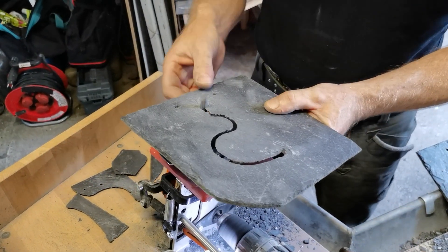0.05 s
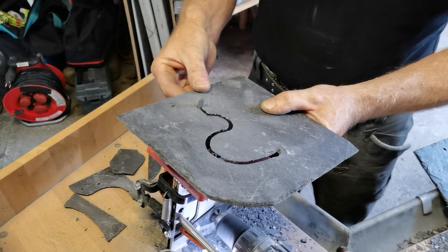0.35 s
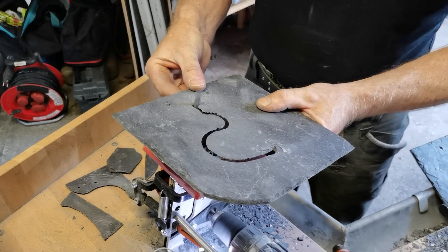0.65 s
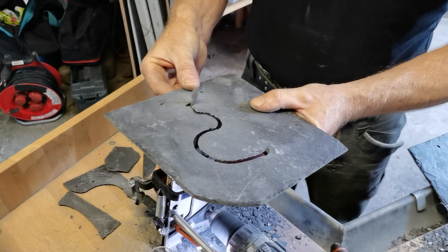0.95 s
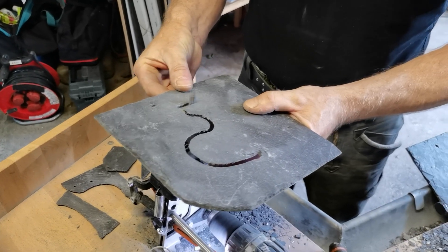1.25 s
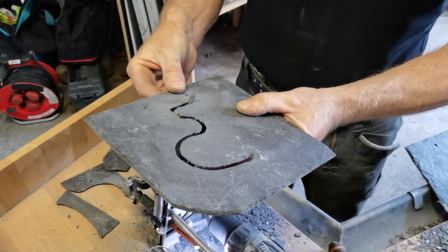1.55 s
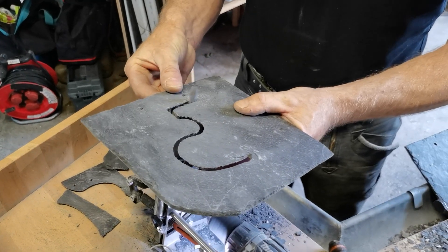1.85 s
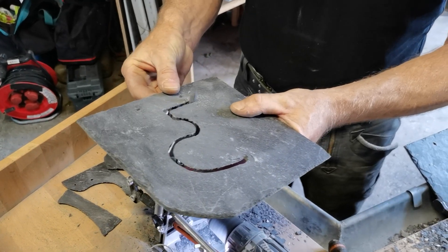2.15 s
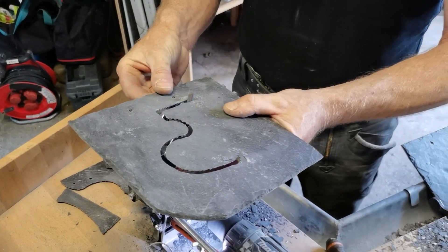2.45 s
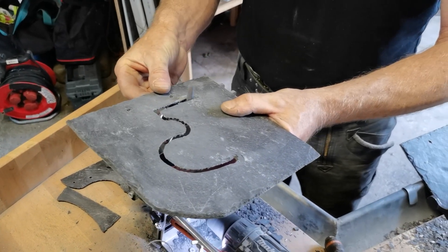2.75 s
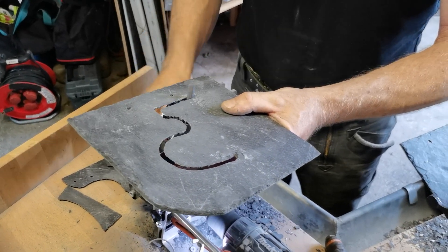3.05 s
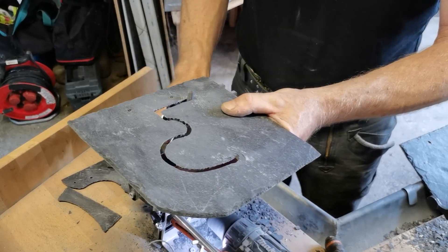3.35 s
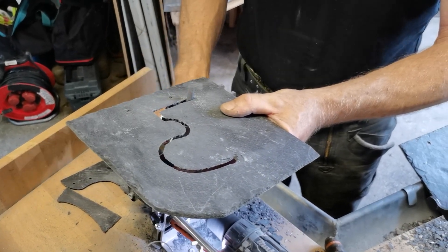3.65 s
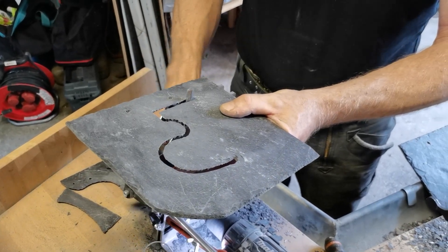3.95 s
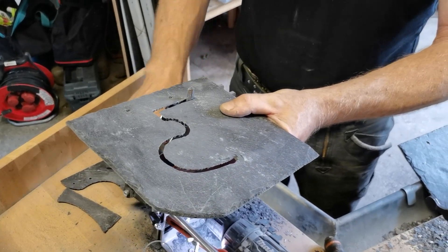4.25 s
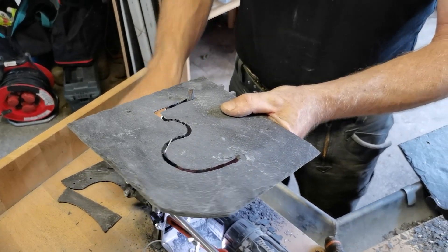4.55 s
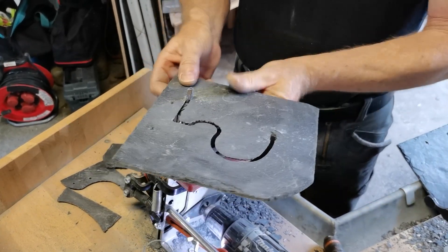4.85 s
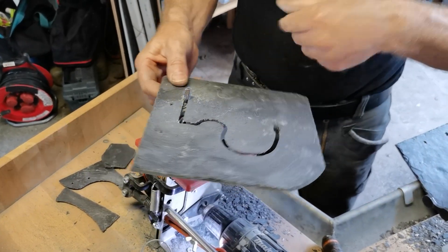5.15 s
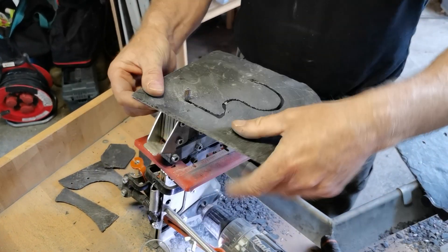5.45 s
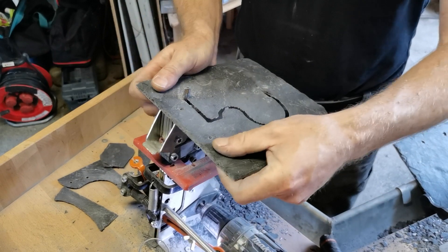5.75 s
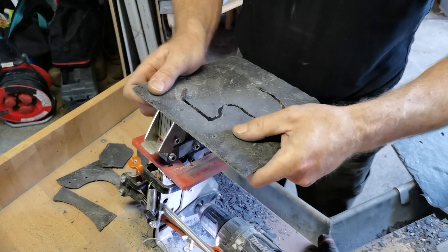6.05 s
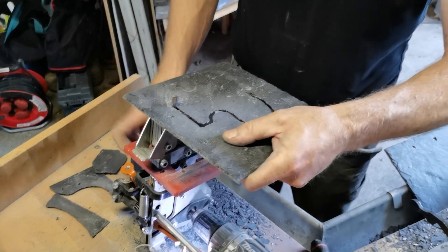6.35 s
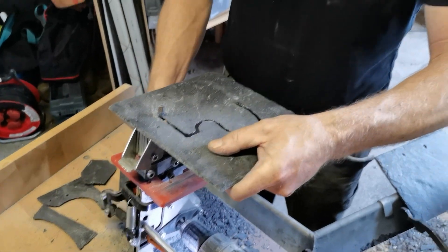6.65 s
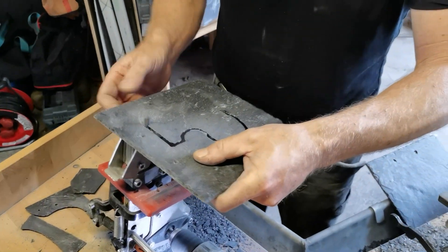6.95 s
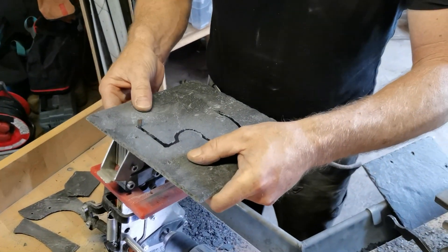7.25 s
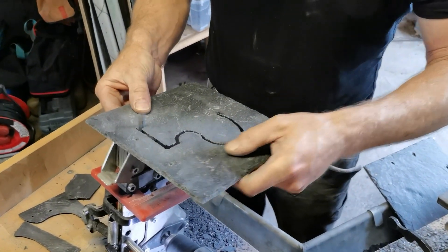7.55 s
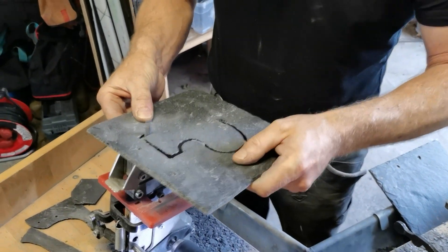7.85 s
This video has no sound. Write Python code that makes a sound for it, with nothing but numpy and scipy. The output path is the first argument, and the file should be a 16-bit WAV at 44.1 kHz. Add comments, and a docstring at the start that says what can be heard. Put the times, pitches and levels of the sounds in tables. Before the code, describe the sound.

A motorized slate cutter nibbles through a stone plate with rapid, uneven chattering over rattling gears, a hum and a thin high whine. After about four seconds the motor stops. The plate is shifted around with quieter knocks, clinks and scrapes and a brief rubbing tone. Then the machine restarts with a jolt and chatters on. It is heard close up in a small workshop.

```python
"""A motor-driven slate nibbler chews a curved slot through a hand-held stone plate in a small workshop.
Its crank punches about 29 times a second over rattling gears, a hum and a high whine. With each push
of the hands the punch bites deeper, knocks the plate, rings and snaps off crumbs. The motor stops and
the frame rings on; the plate is freed, slid round with a brief moan and set down, and cutting resumes."""
import sys
import numpy as np
from scipy import signal
from scipy.fft import rfft, irfft, next_fast_len
from scipy.io import wavfile
from scipy.ndimage import uniform_filter1d

SR = 44100
rng = np.random.default_rng(int(sys.argv[2]) if len(sys.argv) > 2 else 0)


def generate_wav(signal):
    """Clip the signal to [-1, 1] and save it as 16-bit WAV at the path in sys.argv[1]."""
    frames = np.transpose(np.atleast_2d(signal))
    scaled = np.clip(frames, -1, 1) * 32767
    pcm = np.round(scaled).astype(np.int16)
    wavfile.write(sys.argv[1], SR, pcm)


N = 347949
TAPS = 2048
HZ, TIME = np.fft.rfftfreq(TAPS, 1 / SR), np.arange(N) / SR
STOP_S = 4.079  # end of the first cut

# Progress of the crank, one list per cut. Each row: time in seconds, strokes made.
CRANK_TURNS = [
    [(-.0162, -1), (.53, 15), (1.2442, 36), (1.4157, 41), (2.003, 58), (3.4805, 101), (4.0325, 117),
     (4.0781, 118)],
    [(6.7671, 0), (6.9178, 4), (7.0235, 7), (7.1958, 12), (7.6394, 25), (7.88, 32)],
]
# The plate on its rest, one list per cut. Each row: pitch in Hz, width in Hz, level in dB.
PLATE_MODES = [
    [(227, 17, -9), (407, 18, -1.5), (600, 98, -6.5), (756, 53, -7), (1058, 49, -5.5), (1556, 110, -7),
     (1882, 68, -3), (2060, 78, -2), (2622, 37, -6)],
    [(229, 89, 1), (696, 210, -8.5), (1023, 88, -2), (1245, 65, -3.5), (1510, 120, -4.5), (2130, 110, -3.5),
     (2670, 140, -13)],
]
# The steel punch. Each row: pitch in Hz, width in Hz, level in dB.
PUNCH_MODES = [(7160, 200, 1), (7870, 540, 1), (9000, 120, 4.5), (9470, 2100, -0.5), (10850, 470, -10),
               (12700, 1400, -9), (14500, 2500, -23)]
# The plate when it is off the punch. Each row: pitch in Hz, width in Hz, level in dB.
LOOSE_MODES = [(626, 35, -1), (890, 130, -6), (2140, 91, -4.5), (3545, 51, 0), (3630, 50, -21),
               (3930, 94, -1), (4430, 81, -3), (4950, 54, -3), (7100, 110, -10)]
# Tone of the plate bumping and scraping on its rest. Each row: frequency in Hz, level in dB.
BUMP_SPECTRUM = [(35, -39), (60, -2), (215, -2), (280, -10), (419, -1.5), (463, -13.5), (595, -14.5),
                 (774, -50), (1200, -33), (1560, -72), (2640, -120)]
SCRAPE_SPECTRUM = [(350, -26), (600, 0), (807, -6), (875, -7.5), (1280, -8.5), (2130, -11.5), (3060, -11),
                   (3360, -10.5), (4900, -20), (5110, -19), (6000, -17.5), (7060, -24.5), (10400, -17.5),
                   (15000, -44)]


def amp(db):
    """Decibels to gain."""
    return 10 ** (np.asarray(db) / 20)


def unit(x):
    """Scales to rms 1."""
    return x / np.sqrt(np.mean(x ** 2) + 1e-20)


def read(points, hz):
    """Reads a table along a log-frequency axis."""
    f, value = np.transpose(points)
    return np.interp(np.log(hz + 1), np.log(f + 1), value)


def curves(rows, t=TIME):
    """The columns of a time table, joined by straight lines."""
    s, *columns = np.transpose(rows)
    return [np.interp(t, s, c) for c in columns]


def add(mix, s, sound):
    """Mixes a sound in at s seconds."""
    part = mix[max(round(s * SR), 0):][:len(sound)]
    part += sound[:len(part)]


def gate(start, end, rise, fall):
    """Fades in from start and out from end, all in seconds."""
    return np.clip((TIME - start) / rise, 0, 1) * np.clip(1 - (TIME - end) / fall, 0, 1)


def causal(gain):
    """The minimum-phase impulse response of a passive body with this gain curve."""
    log_gain = np.log(np.maximum(gain / gain.max(), 1e-5))
    mirrored = np.r_[log_gain, log_gain[-2:0:-1]]
    return np.fft.ifft(np.exp(np.conj(signal.hilbert(mirrored)))).real


def body(modes):
    """Impulse response of a set of resonances, rolled off outside their range."""
    hz, width, db = np.transpose(modes)[:, :, None]
    power = (amp(db) ** 2 / (1 + (2 * (HZ - hz) / width) ** 2)).sum(0)
    skirts = 1 + (0.39 * hz.min() / (HZ + 1)) ** 4 + (HZ / (1.9 * hz.max())) ** 4
    return causal(np.sqrt(power / skirts))


def struck(modes, colour_db, detune):
    """Each hit lands on another spot, which favours other modes and shifts them a little."""
    return body([(hz * (1 + detune * rng.standard_normal()), width,
                  db + colour_db * rng.standard_normal()) for hz, width, db in modes])


def colour(x, spectrum):
    """Gives a long sound a spectrum, at rms 1."""
    return unit(signal.oaconvolve(x, causal(amp(read(spectrum, HZ))))[:len(x)])


def grit(per_s, spread_db):
    """Tiny fractures of very unequal size."""
    size = amp(spread_db * np.minimum(rng.exponential(1, N), 4))
    return unit(rng.standard_normal(N) * size * (rng.random(N) < per_s / SR))


def wander(per_s):
    """A random drift that glides to a new value per_s times a second."""
    knots = rng.standard_normal(4000)
    return np.interp(TIME * per_s, np.arange(len(knots)), knots)


def blow(response, contact, crack, hold_s, decay_s, alike=0):
    """A crack and a burst of crushing ring a body; alike is the share taken from the contact noise."""
    t = np.arange(len(contact)) / SR
    crush = np.sqrt(alike) * contact + np.sqrt(1 - alike) * rng.standard_normal(len(contact))
    crush *= np.exp(-np.maximum(t - hold_s, 0) / decay_s)
    crush /= np.linalg.norm(crush)
    crush[0] += crack
    sound = signal.fftconvolve(crush, response)
    return sound / np.linalg.norm(sound) * np.sqrt(SR / 100)  # the energy of 10 ms at rms 1


def feed(t, press_db_per_s=298.5, relax_db_per_s=195.5):
    """Ring, knock and snap in dB at times t: the firmest push counts, or else the punch just grazes."""
    # The hands push the plate in. Each row: start and end in seconds, ring in dB,
    # then knock and snap in dB relative to the ring.
    pushes = [(0.034, 0.113, -16, -9.5, -6), (0.152, .36, -16, -1, -9), (0.402, .496, -17, -2, -2.5),
              (0.77, .87, -25, 1, -8), (0.949, .972, -19.5, -5, -1), (1.077, 1.118, -15, 3, -5.5),
              (1.236, 1.414, -18.5, 4.5, -4.5), (1.48, 1.683, -19.5, 5.5, -3.5), (1.745, 2.036, -20, 4, -4),
              (2.072, 2.149, -18.5, 6, -2), (2.174, 2.281, -24.5, 2.5, -3), (2.313, 2.38, -17, 2.5, -4),
              (2.555, 2.617, -16.5, -3, -7), (2.766, 2.791, -15, -0.5, -6), (2.89, 3.272, -20, -2.5, -5.5),
              (3.093, 3.127, -12.5, -7, -13), (3.429, 3.489, -16.5, -0.5, -2),
              (3.556, 3.772, -18, -6, -2.5), (3.805, 4.032, -22.5, -4.5, 3), (4.072, 4.08, -21.5, -2.5, -5),
              (6.88, 6.912, -16.5, 1, -5), (7.026, 7.216, -18.5, -1, -6.5), (7.259, 7.506, -24, -4, -6.5),
              (7.537, 7.645, -18.5, -5.5, -10.5), (7.674, 7.736, -19.5, 0, -4.5),
              (7.852, 7.89, -14.5, -4, -3.5)]
    # The graze between pushes: ring in dB, then knock and snap in dB relative to it.
    graze = (-30, -6.5, -3)
    start, end, ring, knock, snap = np.transpose(pushes)[:, :, None]
    ring = ring - press_db_per_s * np.maximum(start - t, 0) - relax_db_per_s * np.maximum(t - end, 0)
    pushed = np.array([ring, ring + knock, ring + snap]).max(1)
    grazed = graze[0] + np.array([0, graze[1], graze[2]])[:, None]
    off_stone = (t > STOP_S) & (t < CRANK_TURNS[1][1][0])
    return np.where(off_stone, pushed, np.maximum(pushed, grazed))


def strokes(crank, alternate_db=0.4, chance_db=1.55):
    """One stroke a turn: a deep bite leaves less for the next, and the stone breaks unevenly."""
    s, made = np.transpose(crank)
    turn = np.arange(made[-1] + 1)
    times = np.interp(turn, made, s)
    depth_db = -alternate_db * (-1) ** turn + chance_db * rng.standard_normal(len(turn))
    return np.column_stack([times, (feed(times) + depth_db).T])


def cutter(bend_hz=1346, bend_width_hz=54, ring_width_hz=95, ring_mode_db=3.5):
    """Each stroke knocks the plate, rings the modes near the cutter and snaps stone on the steel punch."""
    # Modes near the cutter, one list per cut. Each row: pitch in Hz, width in Hz, level in dB.
    cutter_modes = [
        [(3480, 67, -11.5), (3706, 74, -8.5), (4230, 77, -4), (4096, 170, -1), (4920, 130, -11.5),
         (5370, 1200, -16)],
        [(3230, 96, -5.5), (4116, 140, 2), (4160, 150, -8), (4725, 200, 2.5), (5300, 240, -9)],
    ]
    # The place of the cut sets the main ring and how far the plate bends.
    # Each row: time in seconds, ring pitch in Hz, level of the bending mode in dB.
    cut_place = [(.3, 3970, 9), (1.35, 3770, 7.5), (1.6, 4210, -5.5), (2.1, 4190, -4.5), (2.25, 4200, 10.5),
                 (2.33, 4100, -12), (3.1, 4144, 6), (4, 4152, 4.5), (6.9, 3650, -6), (7.8, 3730, 5)]
    out, contacts = np.zeros(N), rng.standard_normal((3, TAPS))
    for crank, plate_modes, near_modes in zip(CRANK_TURNS, PLATE_MODES, cutter_modes):
        for s, ring_db, knock_db, snap_db in strokes(crank):
            # the contact changes gradually as the slot advances
            contacts = unit(contacts + 0.32 * rng.standard_normal(contacts.shape))
            ring_hz, bend_db = curves(cut_place, s)
            plate = struck([*plate_modes, (bend_hz, bend_width_hz, bend_db)], colour_db=1.85, detune=.008)
            near = struck([*near_modes, (ring_hz, ring_width_hz, ring_mode_db)],
                          colour_db=3.5, detune=.011)
            punch = struck(PUNCH_MODES, colour_db=2.5, detune=.002)
            knock = blow(plate, contacts[0], crack=.33, hold_s=.0037, decay_s=.0049, alike=.79)
            ring = blow(near, contacts[1], crack=.15, hold_s=.0035, decay_s=.0044, alike=.6)
            snap = blow(punch, contacts[2], crack=.27, hold_s=.0035, decay_s=.0033, alike=.55)
            add(out, s, amp(knock_db) * knock + amp(ring_db) * ring + amp(snap_db) * snap)
    return out


def clunks():
    """A hollow knock opens the scene; at the restart the drive takes up its slack and jolts the plate."""
    # The hollow knock: start in seconds, pitch in Hz, width in Hz, level in dB.
    hollow_knock = (0, 830, 260, -49.5)
    # Jolts of the drive. Each row: start in seconds, level in dB.
    jolts = [(6.7675, -39), (6.805, -28)]
    out, contact = np.zeros(N), rng.standard_normal(TAPS)
    s, hz, width, db = hollow_knock
    add(out, s, amp(db) * blow(body([(hz, width, 0)]), contact, crack=.31, hold_s=.004, decay_s=.018))
    for s, db in jolts:
        add(out, s, amp(db) * blow(body(PLATE_MODES[1]), contact, crack=.25, hold_s=.0044, decay_s=.007))
    return out


def motor_speed(gearing, sag_hz=430, inertia_s=.05):
    """Whine pitch in Hz: the crank's pace geared up, sagging under load, smoothed by the rotor's mass."""
    pace = sum(np.gradient(curves(crank)[0]) * SR for crank in CRANK_TURNS)
    load = amp(feed(TIME[::100])).sum(0).repeat(100)[:N]
    load /= load.max()
    surge = load - uniform_filter1d(load, size=SR // 2)
    inertia = np.exp(-1 / (inertia_s * SR))
    sag = signal.lfilter([1 - inertia], [1, -inertia], surge)
    return gearing * uniform_filter1d(pace, size=2600) - sag_hz * sag


def gears(crank_phase, powered, throb=0.24):
    """Gears rattle and dust grinds, the hiss throbbing five times a stroke."""
    # Running noise, one list per cut. Each row: time in seconds, rumble in dB, hiss in dB.
    running_levels = [
        [(0, -26.5, -28.5), (.7, -30, -30), (1.4, -25.5, -28.5), (2.3, -28.5, -30.5), (3.3, -30, -31),
         (4.05, -31.5, -32.5)],
        [(6.78, -37, -43.5), (6.835, -36, -50), (6.865, -25.5, -30), (6.93, -26, -27), (7.3, -26, -26),
         (7.89, -25.5, -26)],
    ]
    # Tone of the gears and of the grinding, one list per cut. Each row: frequency in Hz, level in dB.
    gear_spectra = [
        [(32, -34.5), (55, -14.5), (98, -2.5), (160, -7), (223, 3), (304, -9), (409, 0), (523, -4.5),
         (871, -5.5), (1170, -10), (1360, -5), (2620, -14), (2800, -14), (3640, -45.5), (6160, -120)],
        [(32, -43), (55, -19), (75, -8.5), (152, -2.5), (299, -5.5), (409, -1.5), (523, -5.5), (597, -4),
         (1470, -9), (2800, -15.5), (3640, -45), (6160, -120)],
    ]
    grind_spectra = [
        [(1650, -43), (2800, -11), (3750, 1), (4310, 0), (4630, -4), (6380, -10), (7280, -5.5), (8480, -9.5),
         (9530, -1.5), (10600, -8), (11500, -6.5), (13600, -10.5), (16000, -21.5)],
        [(1650, -31), (2800, -15), (3220, -10), (3750, 1.5), (4370, -10), (4870, -9.5), (5680, -14.5),
         (7280, -11), (8550, -13), (11500, -13), (15200, -20.5), (16000, -15.5)],
    ]
    out = np.zeros(N)
    for on, levels, gear_tone, grind_tone in zip(powered, running_levels, gear_spectra, grind_spectra):
        rumble_db, hiss_db = curves(levels)
        rumble = amp(rumble_db) * colour(grit(per_s=6000, spread_db=3), gear_tone)
        hiss = amp(hiss_db) * colour(grit(per_s=20000, spread_db=1.5), grind_tone)
        out += on * (rumble + hiss * (1 + throb * np.sin(5 * crank_phase)))
    return out


def crank_hum(crank_phase):
    """Crank and gears hum on wavering harmonics of the stroke rate."""
    # Partials of the hum. Each row: multiple of the stroke rate, relative level in dB.
    harmonics = [(3, -39.5), (4, -34.5), (8, -40.5), (14, -39), (15, -50), (19, -40), (23, -43.5)]
    out = np.zeros(N)
    for multiple, db in harmonics:
        level = amp(db + 3.2 * wander(11))
        out += level * np.sin(multiple * crank_phase + 0.55 * wander(16) + 2 * np.pi * rng.random())
    return out


def motor_whine(hz, onset_hz=(10200, 10700)):
    """A thin, fluttering whine that fades in across onset_hz as the motor gathers speed."""
    flutter = amp(1.3 * wander(90))
    phase = 2 * np.pi * np.cumsum(hz + 22 * wander(250)) / SR
    return np.interp(hz, onset_hz, [0, 1]) * flutter * np.sin(phase)


def motor(gearing=380.3, whine_db=-36, hum_db=-1, restart_hum_db=-4):
    """The motor runs once per cut, gearing whine cycles to a stroke. Returns drive noise and hum."""
    whine_hz = motor_speed(gearing)
    crank_phase = 2 * np.pi * np.cumsum(whine_hz) / gearing / SR
    first, second = gate(-1, 4.093, .01, .041), gate(6.77, 8, .0078, .01)
    rattle = gears(crank_phase, powered=(first, second))
    hum = crank_hum(crank_phase) * (amp(hum_db) * first + amp(restart_hum_db) * second)
    whine = amp(whine_db) * (first + second) * motor_whine(whine_hz)
    up_to_speed = (whine_hz / whine_hz.max()) ** 4
    return rattle + whine, up_to_speed * hum


def frame():
    """The machine frame rings on after the first cut until the plate is lifted."""
    # Modes of the frame. Each row: pitch in Hz, level in dB, seconds to fall by 60 dB.
    frame_modes = [(121, -56, 3.6), (218, -60.5, 5.1), (670, -57, 2.4)]
    age = np.maximum(TIME - STOP_S, 0)
    ringing = sum(amp(db - 60 * age / t60) * np.sin(2 * np.pi * hz * age) for hz, db, t60 in frame_modes)
    return ringing * gate(STOP_S, 4.6, .013, .12)


def clinks(detune=0.025, count=6):
    """Small catches ring the plate; its modes shift as the points of support move."""
    out = np.zeros(N)
    for _ in range(count):
        modes = [(hz * (1 + detune * rng.uniform(-1.4, 1)), width, db) for hz, width, db in LOOSE_MODES]
        catches = grit(per_s=55, spread_db=3) * amp(4 * wander(10))
        out += signal.oaconvolve(catches, body(modes))[:N]
    return unit(out)


def sliding(bump_db=-5, scrape_db=-3, clink_db=0.5, contact_db=-73):
    """The plate bumps and scrapes over its rest in swelling shoves, above the light contact of hands."""
    # Shoves. Each row: middle and half length in seconds, relative bumping and scraping in dB.
    shoves = [(4.732, 0.033, -50, -53.5), (5.026, 0.15, -56, -62), (5.413, 0.15, -52, -49),
              (5.563, 0.049, -40.5, -57.5), (5.671, 0.037, -49, -70), (5.81, 0.083, -51.5, -53),
              (6.034, 0.045, -53, -63), (6.267, 0.055, -51.5, -66), (6.67, 0.046, -55, -86.5)]
    middle, half, bumps_db, scrapes_db = np.transpose(shoves)[:, :, None]
    swell = np.exp(-((TIME - middle) / half) ** 2)
    bump_gain = amp(bump_db) * (amp(contact_db) + (amp(bumps_db) * swell).sum(0))
    scrape_gain = amp(scrape_db) * (amp(scrapes_db) * swell).sum(0)
    rasp = colour(grit(per_s=2200, spread_db=2), SCRAPE_SPECTRUM)
    scrape = unit(rasp + amp(clink_db) * clinks())
    bump = colour(grit(per_s=810, spread_db=3), BUMP_SPECTRUM)
    return (bump_gain * bump + scrape_gain * scrape) * gate(4.0, 8.6, .06, .037)


def plate_knocks(ringing_db=0.5, tick_db=-11):
    """Freed and turned, the plate thuds, clacks and ticks against the steel punch."""
    # Knocks of the plate. Each row: start in seconds, thud in dB, clack in dB.
    knocks = [(4.401, -47.5, -56.5), (4.612, -54, -51.5), (4.721, -46.5, -54.5), (4.751, -42.5, -42.5),
              (4.886, -46.5, -52), (5.067, -42, -53.5), (5.122, -66.5, -62.5), (5.18, -66, -65),
              (5.431, -43, -40.5), (5.477, -45, -50), (5.521, -45, -42), (5.59, -45.5, -54),
              (5.752, -48, -52.5), (5.855, -52.5, -50), (5.896, -51, -53), (6.055, -57.5, -66),
              (6.225, -47, -63), (6.375, -67, -73)]
    dull, rasp = causal(amp(read(BUMP_SPECTRUM, HZ))), unit(causal(amp(read(SCRAPE_SPECTRUM, HZ))))
    out = np.zeros(N)
    for s, thud_db, clack_db in knocks:
        contact = rng.standard_normal(TAPS)
        stone = rasp + amp(ringing_db) * unit(struck(LOOSE_MODES, colour_db=4.5, detune=.03))
        thud = blow(dull, contact, crack=.46, hold_s=.003, decay_s=.041)
        clack = blow(stone, contact, crack=.18, hold_s=.0052, decay_s=.016)
        tick = blow(body(PUNCH_MODES), contact, crack=.54, hold_s=.0015, decay_s=.006)
        add(out, s, amp(thud_db) * thud + amp(clack_db) * (clack + amp(tick_db) * tick))
    return out


def moan(overtone_db=-23):
    """The dragged plate sticks and slips on its lowest mode: a wavering tone with weak overtones."""
    # Course of the moan. Each row: time in seconds, pitch in Hz, level in dB.
    glide = [(5.08, 328, -53), (5.206, 327, -60), (5.33, 324.6, -42), (5.366, 314, -40), (5.408, 313, -51),
             (5.456, 310.5, -42), (5.53, 316, -57)]
    hz, db = curves(glide)
    phase = 2 * np.pi * np.cumsum(hz * (1 + 0.00382 * wander(60))) / SR
    overtones = np.sin(2 * phase + wander(50)) + .5 * np.sin(3 * phase + np.pi * wander(36))
    tone = np.sqrt(2) * (np.sin(phase) + amp(overtone_db) * overtones)
    return amp(db) * tone * gate(5.06, 5.6, .0079, .023)


def room_tone(level_db=-66.5):
    """The still workshop: a low rumble under faint hiss."""
    # Tone of the background. Each row: frequency in Hz, level in dB.
    spectrum = [(15, -36), (25, -3), (66, -2), (131, -7), (202, -22), (363, -23), (952, -34.5),
                (1310, -30.5), (2930, -44), (15000, -50.5)]
    return amp(level_db) * colour(rng.standard_normal(N), spectrum)


def workshop(x):
    """Dense reflections off near benches and walls, each band dying at its own speed."""
    # Decay of the room. Each row: frequency in Hz, seconds to fall by 60 dB.
    decay_times = [(100, 0.35), (260, 0.47), (700, 0.54), (1840, 0.47), (4850, .44), (14000, 0.26)]
    onset = np.clip((np.arange(SR) / SR - .005) / .0011, 0, 1)
    echoes = rng.standard_normal(SR) * (rng.random(SR) < .1) * onset
    hz, t, bands = signal.stft(echoes, SR, nperseg=256)
    tail = signal.istft(bands * amp(-60 * t / read(decay_times, hz)[:, None]), SR, nperseg=256)[1]
    return signal.fftconvolve(x, tail / np.linalg.norm(tail))[:N]


def stereo(x):
    """Two microphone ports, alike in the bass: their case shades the treble and their echoes differ."""
    # Shading by the case. Each row: frequency in Hz, left minus right in dB.
    tilt = [(900, 0), (1800, -1), (4200, -.7), (6400, 1.5), (8000, 8), (10000, 9), (15000, 6.5)]
    # Phase between the ports. Each row: frequency in Hz, lead of the left in radians.
    lead = [(8500, 0), (9990, -1), (11600, 0)]
    # Reflections that differ between the ports. Each row: frequency in Hz, level in dB.
    width = [(350, -76), (700, -57.5), (1200, -56.5), (2400, -35.5), (4200, -26), (9800, -19.5)]
    size = next_fast_len(N + TAPS)
    hz, mid = np.fft.rfftfreq(size, 1 / SR), rfft(x, size)
    ratio = amp(read(tilt, hz)) * np.exp(1j * read(lead, hz))
    scatter = rng.standard_normal(TAPS) * np.exp(-np.arange(TAPS) / SR / .012)
    diffuse = mid * rfft(scatter / np.linalg.norm(scatter), size) + rfft(workshop(x), size)
    side = mid * (ratio - 1) / (ratio + 1) + amp(read(width, hz)) * diffuse
    return irfft(np.array([mid + side, mid - side]), size)[:, :N]


def scene(cutter_room_db=-16, motor_room_db=-5, handling_room_db=-8):
    """The plate faces the listener; the motor under it sounds more into the workshop."""
    bites = cutter() + clunks()
    drive, hum = motor()
    handling = sliding() + plate_knocks() + moan()
    send = amp(cutter_room_db) * bites + amp(motor_room_db) * drive + amp(handling_room_db) * handling
    return stereo(bites + drive + hum + handling + frame() + workshop(send) + room_tone())


def record(dry, cutoff_hz=15850):
    """Rounds off the hardest peaks at full scale, then cuts the highest treble."""
    limited = dry / (1 + dry ** 6) ** (1 / 6)
    lowpass = signal.firwin(401, cutoff_hz, window=("kaiser", 8), fs=SR)
    return signal.oaconvolve(limited, lowpass[None], "same")


dry = scene()
out = record(dry)
generate_wav(out)
```